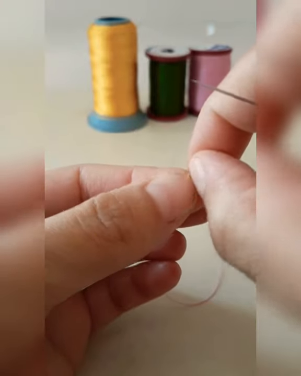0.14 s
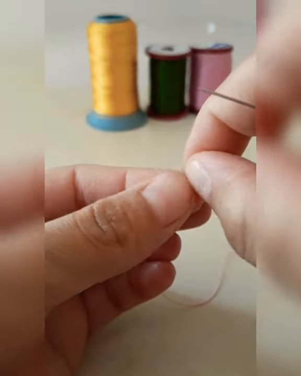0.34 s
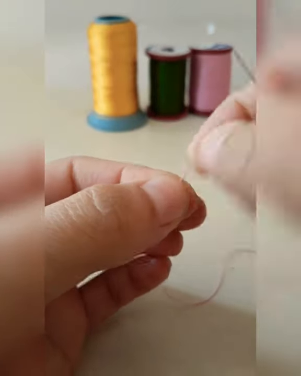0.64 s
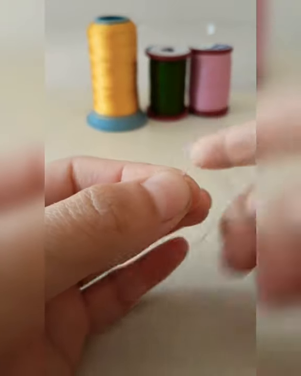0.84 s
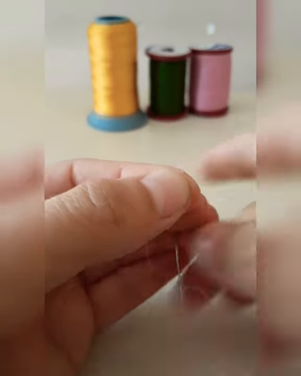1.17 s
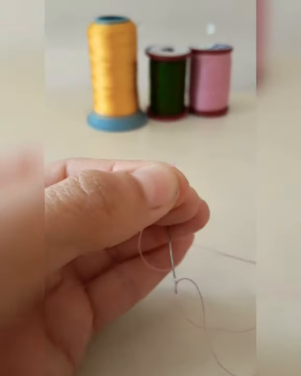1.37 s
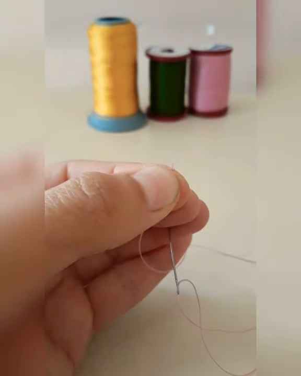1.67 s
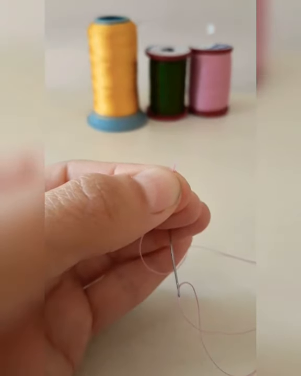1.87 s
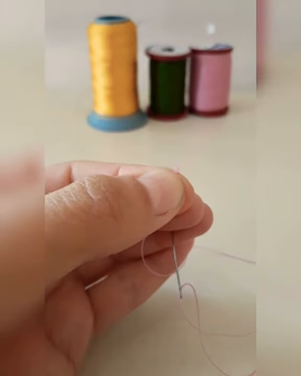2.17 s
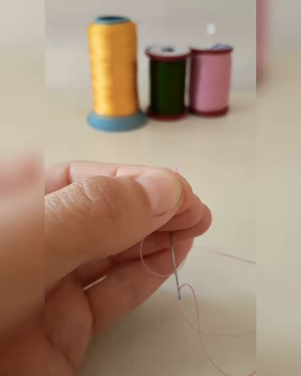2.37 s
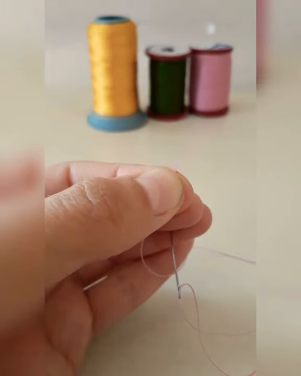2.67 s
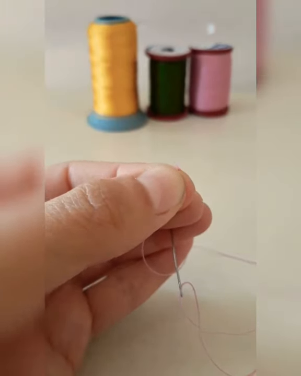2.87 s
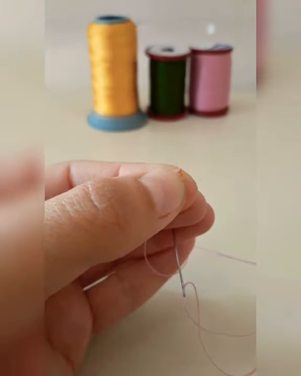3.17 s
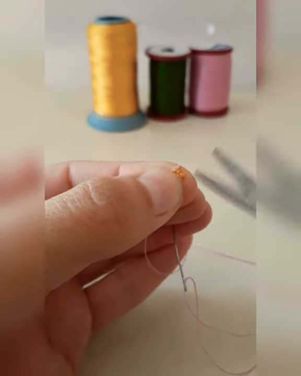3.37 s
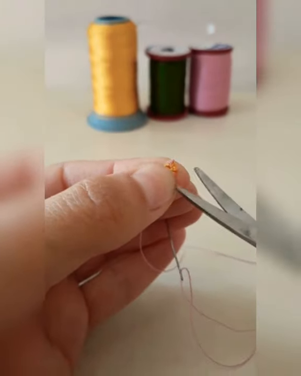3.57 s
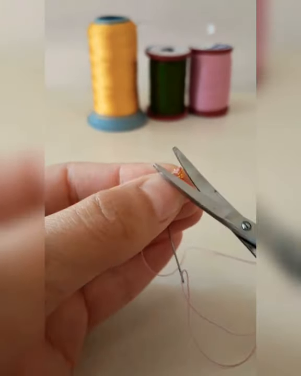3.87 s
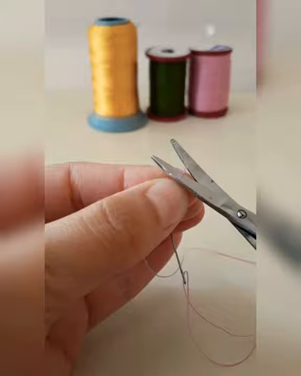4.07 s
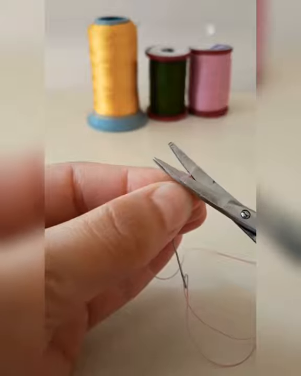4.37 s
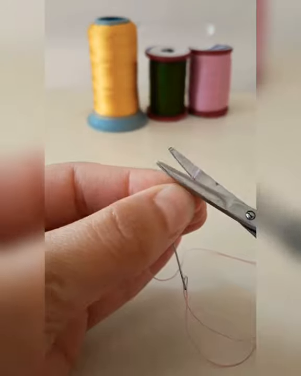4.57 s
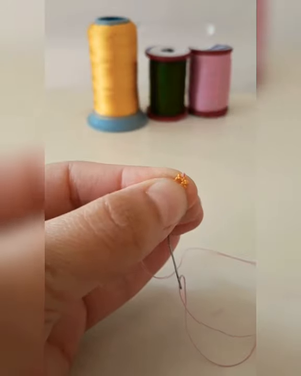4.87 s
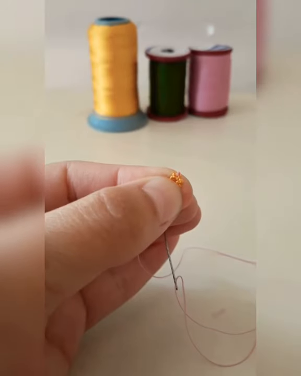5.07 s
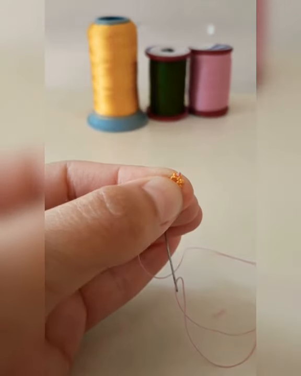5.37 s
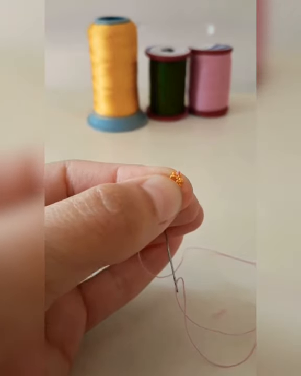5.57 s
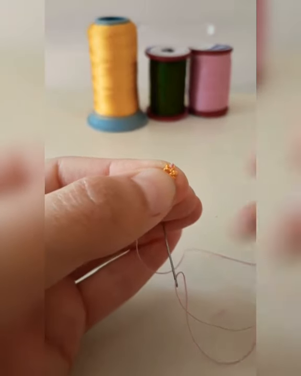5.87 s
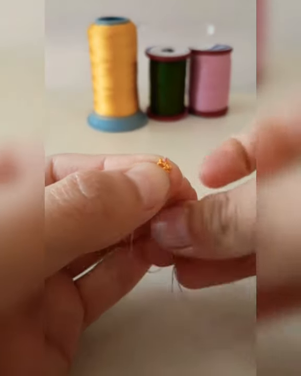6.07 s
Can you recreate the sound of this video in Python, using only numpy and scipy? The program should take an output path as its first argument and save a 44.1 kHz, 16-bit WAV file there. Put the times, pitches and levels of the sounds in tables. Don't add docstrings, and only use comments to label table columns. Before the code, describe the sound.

Scissors rattle harshly off a hard table, thread and fingers rustle, then a faint snip and a clack as they are laid down.

```python
import sys
import numpy as np
from scipy import signal
from scipy.fft import rfft, irfft, next_fast_len
from scipy.io import wavfile
from scipy.ndimage import map_coordinates

SR = 44100
rng = np.random.default_rng(int(sys.argv[2]) if len(sys.argv) > 2 else 0)


def master(y):
    cut = np.clip(np.atleast_2d(y).T, -1, 1)
    pcm = np.round(cut * 32767)
    wavfile.write(sys.argv[1], SR, pcm.astype(np.int16))


def volts(x):
    e = np.asarray(x, float) / 20
    return 10 ** e


N = 274610

# frequency in Hz, level in dB per Hz.
HANDLE_COLOUR = [(290, -37.5), (500, -12), (581, -30.5), (665, -6), (925, -10), (1080, -1.5), (1400, -13),
                 (1760, -4.5), (3000, -15.5), (3900, -47.5), (6600, -120)]
# frequency in Hz, level in dB per Hz.
TABLE_COLOUR = [(250, -38.5), (500, -10.5), (620, -13.5), (1040, 0.5), (1350, -8.5), (1800, -6),
                (2280, -10.5), (3000, -22.5)]
# frequency in Hz, level in dB per Hz.
TABLE_BRIGHT = [(1760, -34.5), (3000, -5.5), (4320, -2), (5480, -5.5), (6040, -19.5), (7400, -14.5),
                (8520, -16), (9460, -27.5), (12800, -19.5), (16000, -20.5)]


def unit(x):
    return x / np.sqrt(np.mean(x ** 2) + 1e-20)


def along(points, hz):
    point_hz, value = np.transpose(points)
    return np.interp(np.log(hz + 1), np.log(point_hz + 1), value)


def filtered(x, colour):
    m = next_fast_len(N + 8192)
    gain = volts(along(colour, np.fft.rfftfreq(m, 1 / SR)))
    return irfft(rfft(x, m) * gain, m)[..., :N]


def curves(rows):
    s, *columns = np.transpose(rows)
    return [np.interp(np.arange(N) / SR, s, column) for column in columns]


def swells(rows):
    t, power = np.arange(0, N + 64, 64) / SR, 0
    for s, rise, fall, *db in rows:
        distance = np.where(t < s, (s - t) / rise, (t - s) / fall)
        power = power + volts(np.array(db)[:, None] - 20 * distance) ** 2
    return [np.interp(np.arange(N) / SR, t, np.sqrt(p)) for p in power]


def wobble(rate):
    knots = rng.standard_normal(int(N * rate / SR) + 4)
    return 1.6 * np.tanh(map_coordinates(knots, [np.arange(N) * rate / SR]) / 1.6)


def noise(colour, grain_db=0, rate=300):
    grains = volts(grain_db * wobble(rate)) if grain_db else 1
    return unit(filtered(rng.standard_normal(N) * grains, colour))


def contacts(rows, body, steel, ring_db, body_db, steel_db, thud_db, grows, weight_db, snap, rise, spread, rough):
    # frequency in Hz, level in dB per Hz.
    thud_colour = [(41, -40), (70, -17), (123, -8), (230, -13), (400, -6.5), (438, -1), (600, -24.5),
                   (780, -54), (1320, -120)]
    out, t = np.zeros(N + SR), np.arange(SR // 8) / SR
    shake, click, thud = (np.pad(noise(c), (0, SR)) for c in (body, steel, thud_colour))
    flutter = np.pad(1 - rough + rough * wobble(700), (0, SR))
    for s, db, hz, click_db, t60 in rows:
        start = round(s * SR)
        at = slice(start, start + len(t))
        fade = volts(-60 * t / t60) * (1 - np.exp(-t * hz / rise)) ** 2
        mode = np.sin(2 * np.pi * hz * t)
        below = np.sin(2 * np.pi * hz * (1 - spread) * t)
        above = np.sin(2 * np.pi * hz * (1 + 1.3 * spread) * t)
        ring = volts(ring_db) * (mode + 2 * spread * (below - above)) * flutter[at]
        tone = fade * (ring + volts(body_db) * shake[at])
        click_fade = volts(click_db + steel_db - 60 * t / (snap * t60))
        sharp = click_fade * (1 - np.exp(-t / 0.000077)) ** 2 * click[at]
        low_db = thud_db + grows * db - weight_db * np.log2(hz / 1000)
        low = volts(low_db - 60 * t / 0.06) * (1 - np.exp(-t / 0.0024)) ** 2 * thud[at]
        out[at] += volts(db) * (tone + sharp) + low
    return out[:N]


def hum():
    # time in seconds, level in dB.
    house = [(0, -71), (.1, -70.5), (.39, -58.5), (.46, -64.5), (.98, -69), (1.28, -62), (1.4, -69),
             (2.5, -73), (2.65, -66), (2.97, -64), (3.16, -71), (3.38, -65), (3.85, -69), (4.25, -80),
             (4.75, -65), (5.2, -74.5), (5.62, -60), (6.23, -71)]
    # time in seconds, rumble in dB, hollow note in dB.
    bumps = [(.14, -73, -99), (.21, -90, -68), (.28, -64.5, -65), (.62, -63, -64.5), (.765, -54.5, -76),
             (1.13, -63.5, -80), (1.67, -48, -99), (1.74, -55.5, -99), (2.12, -88, -63.5), (2.33, -68, -69),
             (2.6, -68, -67), (3.08, -84, -75), (3.23, -65, -87), (3.61, -62.5, -76), (4.36, -79, -76.5),
             (4.61, -61, -99), (4.77, -63, -86), (5.39, -54.5, -99), (5.53, -49, -99), (5.711, -62, -93),
             (6.05, -63, -82.5)]
    # frequency in Hz, level in dB per Hz.
    rumble_colour = [(15, -35), (25, -17), (52, -6), (102, 3.5), (151, -2), (170, -7.5), (220, -36.5),
                     (370, -120)]
    hollow_colour = [(700, -41), (900, -9), (980, 5), (1060, -13), (1300, -31.5)]
    drone_colour = [(100, -36), (170, -5), (291, -1), (329, -4.5), (418, -5.5), (553, -15), (605, -18),
                    (800, -21), (1040, -48.5), (1760, -120)]
    rise_s, fall_s = 0.14, 0.086
    steady_rumble_db, hollow_under_house_db = -72, -19
    house_db, = curves(house)
    shock, boom = swells([(s, rise_s, fall_s, *db) for s, *db in bumps])
    rumble_gain = np.hypot(shock, volts(steady_rumble_db + 0.76 * wobble(5.4)))
    hollow_gain = np.hypot(boom, volts(house_db + hollow_under_house_db + 2.4 * wobble(24)))
    drone = volts(house_db + 2.2 * wobble(10)) * noise(drone_colour)
    return rumble_gain * noise(rumble_colour) + hollow_gain * noise(hollow_colour) + drone


def rustle():
    # peak time, rise and fall in seconds, sleeve in dB, finger in dB.
    strokes = [(.27, 0.29, 0.25, -72, -98), (.6, 0.13, 0.13, -59, -85), (.755, 0.039, 0.049, -70, -63.5),
               (.84, 0.31, 0.62, -96, -67.5), (.928, 0.016, 0.06, -63, -71), (.96, 0.15, 0.21, -57.5, -67),
               (1.086, 0.026, 0.036, -76, -63), (1.126, 0.016, 0.11, -66, -80.5),
               (1.18, 0.088, 0.18, -65.5, -76), (1.34, 0.12, 0.59, -81, -73),
               (2.356, 0.062, 0.05, -56, -59.5), (2.456, 0.079, 0.1, -58.5, -60.5),
               (2.59, 0.16, 0.42, -61, -79), (2.74, 0.33, 0.23, -70, -62), (2.84, 0.25, 0.1, -66, -71),
               (3.072, .01, 0.094, -71.5, -91.5), (3.197, 0.0072, 0.19, -70.5, -67),
               (4.74, 0.24, 0.056, -70, -67), (5.1, 0.32, 0.41, -88, -71),
               (5.62, 0.064, 0.26, -74.5, -73.5), (5.784, 0.016, 0.031, -66, -66),
               (5.918, .008, 0.24, -76.5, -72),]
    # frequency in Hz, level in dB per Hz.
    sleeve_colour = [(410, -44), (700, -10), (979, -4), (1170, -11), (1550, 5), (1790, 0), (2300, -14.5),
                     (4000, -11), (5200, -38.5), (8800, -120)]
    skin_colour = [(1530, -36), (2600, -14), (3890, -4), (4430, -1), (6090, -12.5), (8010, -5.5),
                   (9260, -11.5), (10500, -28.5), (12700, -15.5), (16000, -24)]
    sleeve, finger = swells(strokes)
    unsteady = wobble(30)
    cloth = sleeve * volts(1.9 * unsteady) * noise(sleeve_colour, grain_db=0.5, rate=560)
    return cloth + finger * volts(1.2 * unsteady) * noise(skin_colour, grain_db=3.0, rate=440)


def thread():
    # peak time, rise and fall in seconds, level in dB.
    rubs = [(.58, 0.14, 0.13, -69), (.76, .03, .12, -73), (.97, .12, 0.18, -66), (1.09, .02, .1, -71),
            (1.33, .04, .1, -74), (2.35, .05, 0.068, -67), (2.45, .06, .1, -69), (2.6, .05, .1, -72),
            (2.75, .2, 0.16, -70), (5.4, .04, .25, -60)]
    # frequency in Hz, level in dB per Hz.
    weave_colour = [(1500, -42), (2300, -8), (3200, 2), (3900, -6), (4800, -32), (9500, -40), (12000, -14),
                    (14000, -6), (16000, -10.5)]
    return swells(rubs)[0] * noise(weave_colour, grain_db=3.0, rate=300)


def ticks():
    # start in seconds, level in dB, ring in Hz,
    # click in dB, 60 dB decay in seconds.
    touches = [(.928, -43, 3700, -28, .0094), (.9282, -48, 4450, -28, 0.011), (.939, -41, 4000, -25, .0075),
               (.940, -53.5, 7560, -25, .011), (1.087, -33, 3140, -25.5, .004),
               (1.114, -58, 8600, 4, .0075), (1.127, -41.5, 1810, -26, .012),
               (1.146, -51.5, 8360, -7, .0085), (1.1461, -50.5, 12700, -25, .009),
               (1.315, -68, 3590, -11, .11), (1.407, -59, 1840, -15, .018), (1.408, -52, 8360, -11.5, .011),
               (1.518, -62, 1900, -10, .01), (1.745, -66, 7500, 16, .05), (1.809, -58.5, 7500, 20, .03),
               (1.812, -66.5, 7500, 16, 0.25), (1.847, -60, 7500, 13.5, .04), (1.858, -66, 7497, 13, .12),
               (1.893, -66, 7700, 14, .15), (1.908, -64, 7700, 16, .1), (1.918, -66, 7800, 14, .15),
               (1.923, -46.5, 7500, 5.5, .028), (1.936, -55, 7360, 13.5, .067), (1.943, -64, 7400, 16, .12),
               (2.012, -61.5, 4000, 19, .06), (2.025, -61.5, 4000, 14.5, .026), (2.036, -65, 3954, 9, .12),
               (2.05, -68, 4000, 10, .15), (3.198, -59, 3500, -14, .03), (3.201, -64, 3750, -23, .07),
               (3.207, -61, 3600, -25, .06), (5.359, -58, 5200, 12, .03), (5.379, -52, 4490, 7.5, .01),
               (5.383, -58, 4000, 8, .015), (5.434, -52, 5180, 14, .012), (5.444, -52, 4810, 9, .0085),
               (5.783, -49.5, 1802, -19, .022), (5.921, -54, 4410, -19, .0088)]
    # frequency in Hz, level in dB per Hz.
    nail_colour = [(3240, -33), (5500, -3), (6970, -13), (8560, -0.5), (9960, -13), (13000, 0),
                   (15000, -4.5), (16000, -8.5)]
    body = TABLE_COLOUR + TABLE_BRIGHT[2:4] + [(7000, -59.0)]
    return contacts(touches, body, nail_colour, ring_db=8.0, body_db=-15, steel_db=3.5, thud_db=-44.5,
                    grows=0.99, weight_db=6.0, snap=0.48, rise=0.8, spread=0.091, rough=0.21)


def rings():
    # start in seconds, level in dB, frequency in Hz, 60 dB decay in seconds.
    modes = [(1.6451, -42, 445, .06), (1.7241, -24, 4680, .02), (1.7351, -22, 820, .06),
             (1.7366, -19, 4650, .025), (1.7451, -25, 4650, .02), (1.7721, -30, 1420, .08),
             (1.8091, -19, 5700, 0.014), (1.8093, -30, 7550, .03), (1.8121, -24, 2280, .06),
             (1.8301, -34, 500, .1), (1.8476, -20, 4598, .03), (1.8481, -13, 1263, .08),
             (1.8491, -22, 986.5, .18), (1.8901, -34, 491, .1), (1.9261, -17, 1030, .08),
             (1.9301, -18, 666, 0.11), (1.9311, -32, 440.8, .2), (1.9321, -30, 2243, 0.22),
             (1.9331, -36, 1976, .2), (1.9701, -48, 980, .4), (2.0401, -46, 1940, .12),
             (4.5981, -56.5, 4340, 0.031), (4.5983, -58, 4900, .03), (4.6001, -58, 8000, .03),
             (4.6003, -54, 14580, 0.026), (4.6801, -43, 8000, .012), (4.6803, -49, 11500, .008),
             (4.6805, -47, 14000, .008), (5.3581, -41, 1050, .05), (5.3666, -33, 5300, 0.013),
             (5.3668, -42, 8400, .012), (5.3911, -45, 7500, .014), (5.4341, -49, 3500, .012),
             (5.4351, -46, 8400, .012), (5.4441, -52, 4000, .012), (5.4671, -51, 3580, .02),
             (5.4761, -50, 5250, .014)]
    out, t = np.zeros(N + SR), np.arange(SR // 3) / SR
    for s, db, hz, t60 in modes:
        fade = volts(db - 60 * t / t60) * (1 - np.exp(-t * hz / 1.5))
        out[round(s * SR):][:len(t)] += fade * np.sin(2 * np.pi * hz * t)
    return out[:N]


def lay_down():
    # start in seconds, level in dB, ring in Hz, click in dB, 60 dB decay in seconds.
    landings = [(5.356, -33, 1000, -12, 0.038), (5.357, -20.5, 2540, -11, 0.009),
                (5.3665, -15.5, 2156, -1, 0.01), (5.3905, -32, 2216, -5, 0.03),
                (5.436, -35, 777, -23, 0.034), (5.458, -27.5, 896, -11, 0.027),
                (5.466, -42, 608, -15, 0.019), (5.476, -44, 5200, -6, 0.012), (5.511, -31, 802, -26, 0.013),
                (5.518, -42.5, 603, -22.5, 0.016), (5.529, -47.5, 600, -23, 0.035)]
    knuckle = [(2.5991, -45, 1547, -17, 0.04), (2.6001, -40, 710, -15, 0.035), (3.0731, -46, 930, -28, .06),
               (3.0745, -52, 1600, -28, .04), (3.0771, -52, 750, -28, 0.056),
               (3.7371, -49, 1000, -0.5, 0.028)]
    # time in seconds, scrape in dB.
    settling = [(5.35, -77.5), (5.37, -60.5), (5.42, -48), (5.47, -53.5), (5.53, -56.5), (5.6, -77.5),
                (5.7, -88.5)]
    low_slide = noise(TABLE_COLOUR + [(4000, -49.5)], grain_db=3, rate=670)
    slide = low_slide + volts(-7.0) * noise(TABLE_BRIGHT, grain_db=1.5, rate=490)
    knocks = contacts(landings + knuckle, TABLE_COLOUR + [(4000, -29)], TABLE_BRIGHT, ring_db=-0.8,
                      body_db=-9.5, steel_db=-2.5, thud_db=-22, grows=0.74, weight_db=7, snap=0.48,
                      rise=1.4, spread=0.21, rough=0.093)
    return knocks + volts(curves(settling)[0]) * slide


def snip():
    # start in seconds, level in dB, ring in Hz, click in dB, 60 dB decay in seconds.
    bites = [(4.593, -55, 1098, -5, .05), (4.596, -42.5, 1055, -11.5, 0.043),
             (4.601, -36, 1260, -10.5, 0.022), (4.606, -38, 1470, -23.5, 0.039),
             (4.611, -44, 1410, -13, 0.037), (4.618, -39, 1256, -22, 0.027),
             (4.6277, -22.5, 1064, -30.5, 0.02), (4.635, -44, 1190, -32, .015),
             (4.644, -39.5, 1229, -20, 0.031), (4.672, -49, 8900, -19, 0.014),
             (4.680, -30, 4870, -3.5, 0.0091), (4.692, -59, 3290, 6, 0.026)]
    # frequency in Hz, level in dB per Hz.
    blade_colour = [(1760, -53), (3000, -14), (3700, -11), (4800, -3.5), (6710, -18), (8230, -0.5),
                    (10100, -37), (11000, -9), (12900, -19), (14400, -3.5), (16000, -19.5)]
    body = HANDLE_COLOUR[:7] + [(1750, -9), (2100, -42), (3000, -90)]
    return contacts(bites, body, blade_colour, ring_db=1.5, body_db=-14, steel_db=0.5, thud_db=-65.5,
                    grows=0, weight_db=-3, snap=0.89, rise=1.7, spread=0.13, rough=0.086)


def pick_up():
    # start in seconds, level in dB, ring in Hz, click in dB, 60 dB decay in seconds.
    blows = [(1.599, -21, 1610, -23, 0.021), (1.612, -34.5, 1730, -23, 0.029),
             (1.643, -29, 1000, -19, 0.047), (1.661, -28, 1100, -21.5, 0.034),
             (1.678, -32.5, 641, -23.5, 0.018), (1.711, -15, 1580, -18, 0.07),
             (1.724, -12.5, 1538, -8, 0.032), (1.7335, -8, 1483, -12, 0.037),
             (1.737, -4, 1090, -15.5, 0.015), (1.745, -13, 1000, -17, 0.023), (1.752, -19, 1210, -20, .015),
             (1.766, -24, 1500, -15, .02), (1.778, -21, 1420, -18, .03), (1.786, -20, 1650, -18, .02),
             (1.797, -24, 1500, -12, .015), (1.804, -18.5, 1630, -16, .025),
             (1.8095, -8, 1623, -5.5, 0.027), (1.815, -11, 1865, -12, 0.055),
             (1.8285, -7.5, 1700, -11, 0.009), (1.847, 2, 1750, -14.5, .016),
             (1.848, -2.5, 1038, -23.5, .06), (1.8525, -6.5, 1148, -14, .012),
             (1.859, -12.5, 1250, -20.5, .03), (1.871, -18.5, 1090, -18, .03),
             (1.882, -16.5, 1560, -15.5, 0.014), (1.895, -18, 2000, -8, .015),
             (1.9005, -8, 1974, -29, 0.046), (1.914, -11.5, 1898, -17, 0.033),
             (1.9225, -6, 1947, -13, 0.032), (1.926, -4, 1450, -11, 0.018), (1.918, -12, 1960, -10, .02),
             (1.9365, 0, 800, -14, 0.006), (1.939, -12, 1000, -14, .015), (1.941, -15.5, 667, -26, 0.046)]
    # time in seconds, scrape in dB.
    drag = [(1.59, -110), (1.61, -58), (1.695, -47), (1.725, -30.5), (1.775, -43.5), (1.84, -28.5),
            (1.925, -24), (1.96, -40.5), (2.2, -110)]
    # frequency in Hz, level in dB per Hz.
    handle_bright = [(1760, -36.5), (3000, 0.5), (4170, -4.5), (4630, -2), (5070, -9), (6530, -26.5),
                     (7510, -22), (9800, -42.5), (13200, -44), (16000, -52)]
    scrape_db, = curves(drag)
    steel_gain = volts(0.23 * scrape_db - 1.5)
    chatter = noise(HANDLE_COLOUR, grain_db=2.0, rate=180)
    chatter = chatter + steel_gain * noise(handle_bright, grain_db=6.5, rate=450)
    knocks = contacts(blows, HANDLE_COLOUR, handle_bright, ring_db=-2.0, body_db=-10.5, steel_db=-1.0,
                      thud_db=-43, grows=-0.22, weight_db=0.5, snap=.8, rise=0.68, spread=.16, rough=.12)
    return knocks + volts(scrape_db) * chatter


def room(x):
    # frequency in Hz, 60 dB decay in seconds, level in dB.
    walls = [(70, .2, -22), (150, .5, -3), (463, 0.2, 6), (1000, .25, -6), (1500, .25, -9), (2100, .33, -2),
             (3500, .38, 1), (5000, .35, 3), (8000, .25, 3), (13000, .18, 1.5)]
    out, hop = np.zeros(N + SR), SR // 12
    hz, t, z = signal.stft(rng.standard_normal((N // hop + 1, SR // 3)), SR, nperseg=256)
    t60, db = (along([(w[0], w[k]) for w in walls], hz)[:, None] for k in (1, 2))
    tails = signal.istft(z * volts(db - 60 * t / t60), SR, nperseg=256)[1]
    for start, tail in zip(range(0, N, hop), tails):
        wet = signal.fftconvolve(x[start:start + hop], tail / np.linalg.norm(tail))
        out[start + 200:][:len(wet)] += wet
    return out[:N]


def scene():
    lifted, laid, cut, small, ringing = pick_up(), lay_down(), snip(), ticks(), rings()
    to_walls = volts(-8.5) * lifted + volts(-7) * laid + volts(-19) * cut + volts(-13) * small + volts(-12) * ringing
    direct = lifted + laid + cut + small + ringing
    return (direct + room(to_walls) + rustle() + hum() + thread())[None]


def band_limit(x):
    return signal.sosfilt(signal.butter(12, 16490, fs=SR, output="sos"), x)


def record(dry):
    # frequency in Hz, gain in dB.
    microphone = [(20, -13), (45, -5), (80, -2), (200, 1), (15900, -2.5), (16500, -31.5), (17500, -70)]
    # frequency in Hz, level in dB per
    # Hz.
    hiss_colour = [(88, -41), (150, -13.5), (220, -0.5), (330, -9), (500, -5.5), (620, -15), (950, -17.5),
                   (1400, -23), (3100, -21), (5600, -21.5), (6500, -25), (8500, -26.5), (9900, -32),
                   (11800, -24), (14500, -18.5), (15900, -18), (16200, -50.5)]
    hiss_db = -69.5
    heard = filtered(dry, microphone) + volts(hiss_db) * noise(hiss_colour)
    return band_limit(heard)


dry = scene()
out = record(dry)
master(out)
```